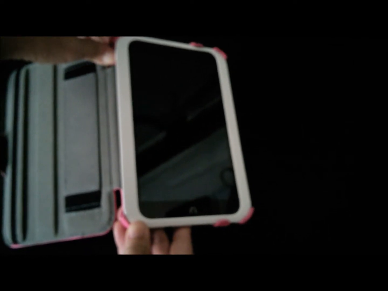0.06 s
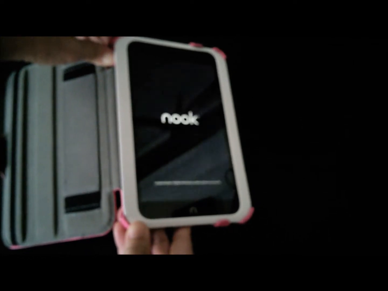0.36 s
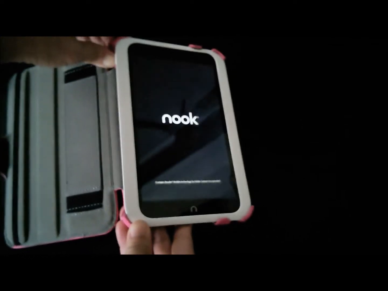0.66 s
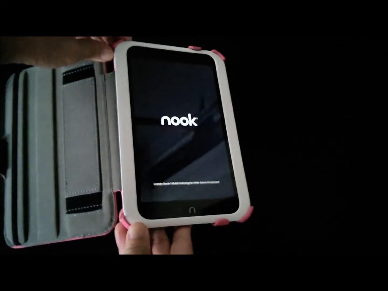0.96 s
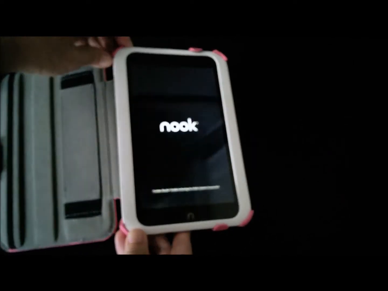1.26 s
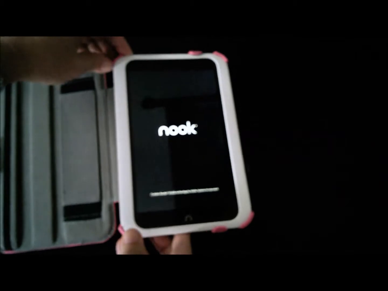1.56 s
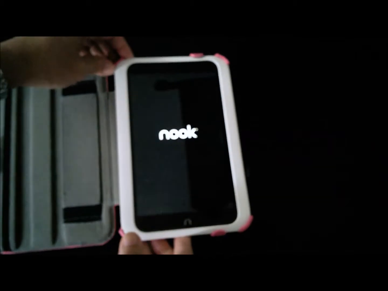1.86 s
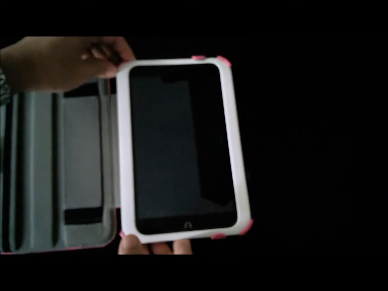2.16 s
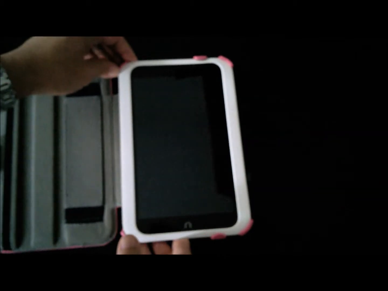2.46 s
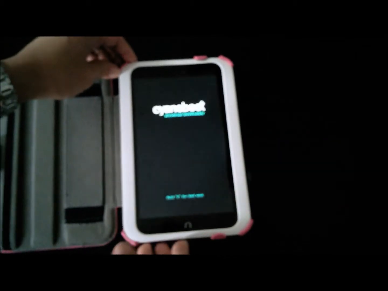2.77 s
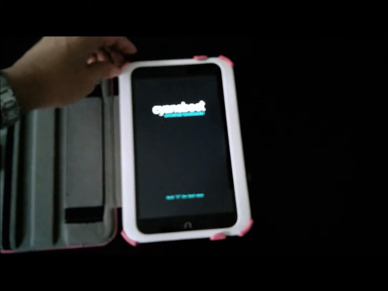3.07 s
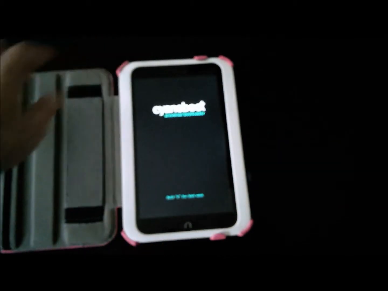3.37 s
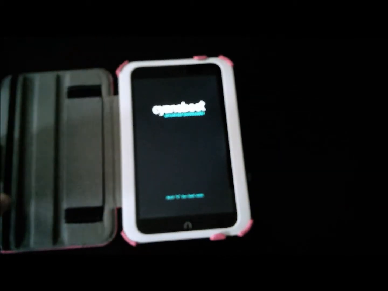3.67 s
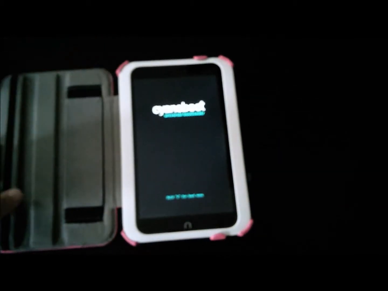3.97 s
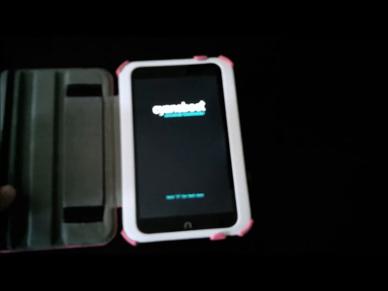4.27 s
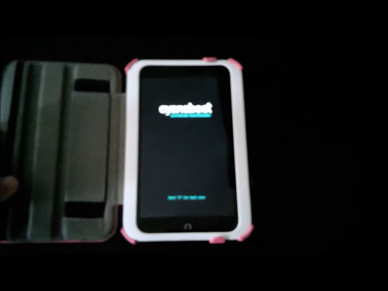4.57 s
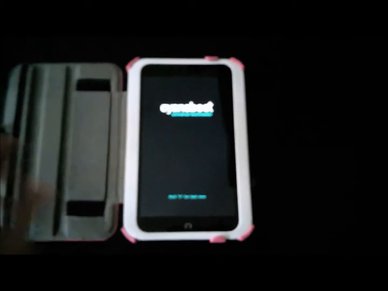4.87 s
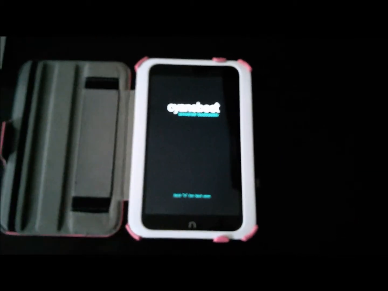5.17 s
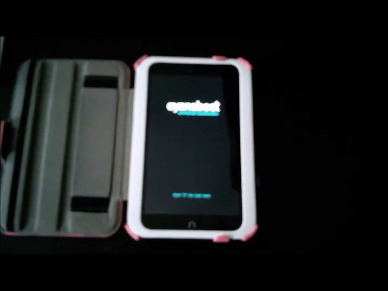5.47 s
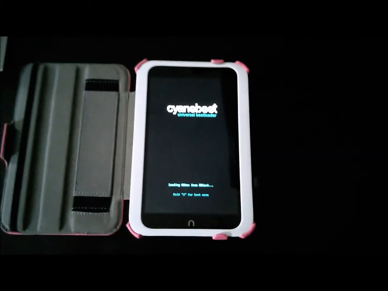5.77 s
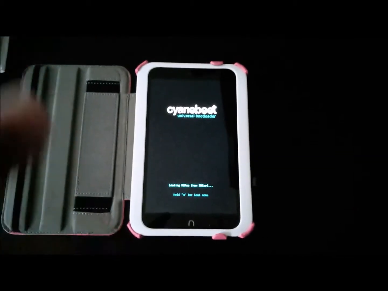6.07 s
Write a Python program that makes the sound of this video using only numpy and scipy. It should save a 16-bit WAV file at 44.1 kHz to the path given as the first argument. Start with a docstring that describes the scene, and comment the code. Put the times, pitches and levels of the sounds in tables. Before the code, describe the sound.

A plastic button clicks, a tablet case knocks onto a table, and its cover slaps down sharply in a quiet room.

```python
"""In a small quiet room, a tablet in a folio case is handled close by. Its button clicks, fingers rub and
bump the case, it is set down on a table, a hand slides over the cover, the flap slaps down and the
tablet rocks to rest. Impacts excite the damped modes of case and table; sliding friction gives grainy
noise and stick-slip squeaks. A high hiss lingers after each hit. A clock ticks faintly once a second
over a soft, steady hiss."""
import sys
import numpy as np
from scipy import signal
from scipy.fft import rfft, irfft
from scipy.io import wavfile

SR = 44100
rng = np.random.default_rng(int(sys.argv[2]) if len(sys.argv) > 2 else 0)


def master_out(mix):
    """Clip the mix to full scale and print it as 16-bit PCM to the path in sys.argv[1]."""
    frames = np.transpose(np.atleast_2d(mix))
    ceiling = np.clip(frames, -1, 1)
    pcm = np.round(ceiling * 32767).astype(np.int16)
    wavfile.write(sys.argv[1], SR, pcm)


N = 278461
TIME = np.arange(N) / SR
AGE = TIME[:SR // 4]   # seconds since a contact

# Spectra of noises and impacts. Each row: frequency in Hz, relative spectral density in dB.
HISS_SPECTRUM = [(15, -46.5), (25, -7.5), (145, -19), (256, -11.5), (503, -30.5), (754, -15), (911, 2.5),
                 (1130, -13), (1440, -6.5), (1610, -17), (1890, -5), (2050, -10), (2480, -11.5),
                 (6920, -14.5), (16000, -10.5)]
RUB_SPECTRUM = [(180, -20.5), (290, 5.5), (370, 4), (470, -11), (630, 7.5), (780, -9), (950, 1.5),
                (1250, 0), (1500, -7.5), (2100, -8.5), (3200, -25), (6000, -31.5)]   # fingers on the case
RUMBLE_SPECTRUM = [(55, -14.5), (85, -8), (130, -2), (185, -19.5), (270, -7)]   # the case under their weight
SWISH_SPECTRUM = [(600, -14.5), (950, -1), (1500, 4.5), (2000, 5.5), (2800, -0.5), (3900, -6.5),
                  (5200, -8.5), (6400, -17.5), (10500, -12.5), (16000, -22.5)]   # a hand sliding on the cover
DRAG_SPECTRUM = [(80, -20.5), (130, -9.5), (190, -31), (290, -1), (480, -7), (650, 4.5), (780, -15),
                 (950, 10), (1300, -15.5), (2000, -31.5)]   # the same hand pressing down
SNAP_SPECTRUM = [(300, 1), (1000, 0.5), (1800, 2), (2400, -7), (3000, 4), (3600, -9.5), (4500, 5),
                 (6500, -8.5), (11000, -9.5), (16000, -7)]   # plastic clicking
CLACK_SPECTRUM = [(300, -14.5), (800, 6), (1500, 3.5), (2050, -5.5), (2700, -21), (3600, -33), (5000, -33),
                  (7000, -52), (15000, -56)]   # hard parts meeting
CRACK_SPECTRUM = [(120, -18), (300, -7), (480, -5), (860, 4.5), (1250, -2), (1750, -2), (2200, -5),
                  (2800, -9), (3600, -21.5), (5000, -22.5), (7000, -44.5), (15000, -53.5)]   # the flap landing
# Electronic whine. Each row: frequency in Hz, rms level in dB.
WHINE_TONES = [(6918, -88.5), (9905, -93.5), (10890, -85.5), (11881, -80.5)]
# Short room reverberation, plus (last row) a high hiss that lingers after each hit.
# Each row: frequency in Hz, T60 in seconds, level in dB re the direct sound.
TAIL_DECAY = [(124, 0.5, -7), (300, 0.2, -5), (600, 0.092, -11.5), (1300, 0.27, -11.5), (2800, 0.25, -9.5),
              (4560, .27, -12), (7440, .4, -6.5), (13900, 0.97, 0)]
# The clock's resonances. Each row: frequency in Hz, bandwidth in Hz, relative gain in dB.
CLOCK_MODES = [(1003, 150, 0.5), (1203, 370, 0), (1637, 330, -9), (2976, 390, -4), (3416, 250, -9)]
# Successive ticks. Each entry: level in dB.
TICK_LEVELS = [-57.5, -57, -56.5, -57.5, -58, -58.5, -67.5]
# Dry skin brushing the cover. Each row: start in seconds, length in seconds, relative level in dB.
SKIN_BRUSHES = [(0.483, 0.69, -70.5), (0.7, 0.26, -70), (1.494, 0.79, -71.5), (2.214, 0.23, -70.5),
                (2.502, 0.35, -70.5), (2.85, 0.21, -67.5), (3.243, 0.21, -66.5), (3.529, 0.05, -53.5),
                (3.656, 0.037, -51), (3.74, 0.37, -69), (4.018, 0.21, -61), (4.857, 0.12, -63),
                (5.14, 0.14, -69.5), (5.537, .15, -69)]
# Shifts of grip. Each row: start in seconds, length in seconds, rub level in dB, rumble in dB re the rub.
GRIP_SHIFTS = [(.72, 0.21, -67, -1.5), (1.1, 0.27, -67, -5.5), (1.44, 0.18, -62.5, -2),
               (1.61, 0.24, -64.5, -8), (1.8, 0.23, -61.5, -7), (2.045, 0.14, -70, 1.5),
               (2.185, 0.41, -61.5, -1.5), (2.312, 0.075, -54.5, -16), (2.57, 0.6, -69.5, -20),
               (2.885, 0.118, -52, -24.5), (3.89, 0.32, -61.5, -9), (4.03, 0.3, -55.5, -9.5),
               (4.21, 0.36, -56, -13), (4.79, 0.15, -57, 4), (5.14, 0.19, -58, -9), (5.3, 0.13, -64, -6),
               (5.47, 0.25, -63.5, -8), (5.535, 0.062, -47, 4)]
# Strokes along the cover. Each row: start in seconds, length in seconds, crest as a share of the length,
# swish level in dB, drag in dB re the swish.
HAND_STROKES = [(3.532, 0.097, 0.041, -45, 1.5), (3.613, 0.052, 0.56, -41.5, -11),
                (3.656, 0.072, 0.22, -45, -13.5), (3.7, 0.18, 0.086, -64, -5.5),
                (4.568, .075, 0.9, -47.5, -8), (4.627, 0.04, 0.5, -36, -32)]
# Fingertip squeaks. Each row: start in seconds, length in seconds, pitch in Hz, levels of the
# fundamental and of the octave in dB.
FINGER_SQUEAKS = [(0.82, 0.013, 3160, -58.5, -59), (3.897, 0.015, 655, -59, -48.5),
                  (4.044, 0.041, 636, -57.5, -46), (4.087, 0.023, 622, -41, -44.5),
                  (4.351, 0.044, 720, -73, -54.5), (5.163, 0.053, 640, -49, -75),
                  (5.204, 0.015, 717, -71, -55), (5.231, 0.015, 4950, -70, -83),
                  (5.237, 0.013, 733, -57, -47), (5.322, .014, 4700, -65.5, -87),
                  (5.321, 0.046, 627, -45, -79), (5.376, 0.023, 637, -51.5, -79),
                  (5.46, 0.04, 670, -48.5, -74)]
# The tablet rocking on its cover. Each row: start in seconds, peak level in dB.
ROCK_CONTACTS = [(5.012, -55), (5.808, -54.5), (5.942, -60), (6.067, -63.5), (6.181, -54.5), (6.291, -59)]
# Modes of the plastic shell. Each row: frequency in Hz, relative level in dB, T60 in seconds.
SHELL_MODES = [(405.3, -21, 0.047), (851, -8, 0.049), (1227, -12.5, 0.034), (4660, -22, .012)]
# Plastic clicks. Each row: start in seconds, snap level in dB, relative level of the ring in dB.
BUTTON_CLICKS = [(0.097, -14, -11.5), (0.825, -40, -32), (3.812, -37.5, -35), (4.551, -32, -4),
                 (4.667, -17, -26), (4.854, -18.5, -21), (5.556, -45, -26)]
# Modes of case and table. Each row: frequency in Hz, gain in dB, T60 in seconds.
BODY_MODES = [(128, 5, 0.18), (208, -8, 0.11), (276, 1.5, 0.082), (338, -9, 0.084), (383.4, -7, .15),
              (455, -15, 0.061), (640, -6.5, 0.092), (867, 1, 0.063), (948, -1.5, 0.23), (1150, -16.5, .15),
              (1516, -12, 0.21), (1556, -2.5, 0.21), (1696, -8, .07), (1825, -12, 0.058), (2110, -15, .12),
              (2700, -9, .15)]
# Weight settling on the table. Each row: start in seconds, peak level in dB.
TABLE_THUMPS = [(1.221, -60.5), (3.906, -49), (4.494, -49), (4.669, -40.5), (5.235, -54.5), (5.563, -37.5)]
# The stiff flap landing. Each row: start in seconds, peak level in dB, pitch in Hz, hardness in dB.
FLAP_SLAPS = [(4.6654, -10.5, 1634, 3.5), (4.6681, -15, 1700, 8.5), (5.556, -34, 2150, -26),
              (5.566, -33, 1970, -13)]
# Blows on the case. Each row: start in seconds, level in dB, pitch in Hz, hardness in dB.
CASE_KNOCKS = [ (0.707, -49, 653, 1.5), (0.727, -48, 770, -5), (1.223, -51, 900, -7),
               (1.651, -59.5, 527, 9), (1.845, -40, 1110, -17), (1.850, -44.5, 590, -14),
               (2.331, -45.5, 494, 1), (2.502, -51.5, 370, -6), (2.872, -55.5, 400, 4),
               (2.903, -63, 520, 7), (3.2645, -13.5, 383, -25), (3.2772, -12.5, 748, -8),
               (3.296, -28, 544, -28), (3.3151, -16, 613, -12), (3.3585, -33, 660, -22),
               (3.367, -29.5, 575, -11), (3.453, -35.5, 563, -7), (3.462, -37, 544, -15),
               (3.892, -54, 626, 2), (4.405, -39.5, 470, -7), (4.457, -44.5, 625, -20),
               (4.536, -40.5, 550, -5), (4.8009, -20.5, 615, -30), (4.846, -30.5, 473, -22),
               (4.8542, -29.5, 650, -1.5), (4.860, -26.5, 548, -10), (5.236, -39, 387, -9),
               (5.344, -43.5, 565, -18), (5.352, -43.5, 318, -24), (5.4892, -30.5, 590, -11),
               (5.522, -27, 613, -12), (5.527, -32.5, 303, -22), (5.539, -26.5, 610, -32),
               (5.556, -24, 793, -1.5), (5.566, -27.5, 523, -13), (5.574, -30, 770, -26),
               (5.66, -40, 570, -14)]


def from_db(db):
    """Decibels to amplitude ratio."""
    return 10 ** (np.asarray(db) / 20)


def unit_rms(x):
    """Normalisation to unit power."""
    return x / np.sqrt(np.mean(x ** 2) + 1e-20)


def add(track, start_s, sound):
    """Superposition: a sound adds to the track from its start time."""
    start = int(start_s * SR)
    track[start:start + len(sound)] += sound[:N - start]


def colour(x, spectrum):
    """A minimum-phase filter of unit power gain follows a spectrum, falling 18 dB an octave outside it."""
    size = 8192
    hz, db = np.transpose(spectrum)
    octave = np.log2(np.maximum(np.arange(size // 2 + 1), 1) * SR / size)
    beyond = np.abs(octave - np.clip(octave, np.log2(hz[0]), np.log2(hz[-1])))
    gain = from_db(np.interp(octave, np.log2(hz), db) - 18 * beyond)
    cepstrum = irfft(np.log(gain))
    causal = (np.arange(size) > 0) & (np.arange(size) < size // 2)
    response = irfft(np.exp(rfft(2 * cepstrum * causal)))
    return signal.fftconvolve(x, response / np.linalg.norm(response))[:len(x)]


def resonance(x, hz, width_hz):
    """A damped two-pole resonator with unit peak gain."""
    radius = np.exp(-np.pi * width_hz / SR)
    numerator = np.array([1, 0, -1]) * (1 - radius ** 2) / 2
    denominator = [1, -2 * radius * np.cos(2 * np.pi * hz / SR), radius ** 2]
    return signal.lfilter(numerator, denominator, x + 1e-18)


def swell(peak_s):
    """Envelope of a damped contact: it builds to 1 and quickly dies away."""
    u = AGE / peak_s
    return (u * np.exp(1 - u)) ** 3


def burst(spread_s, feedback=.85):
    """All-pass scattering: short echoes in the shell spread an impulse without giving it a pitch."""
    delays_s = spread_s / np.array([[1], [2], [3], [5], [8]]) * rng.uniform(.8, 1.2, (5, 1))
    echo = np.exp(-2j * np.pi * np.round(delays_s * SR) * np.arange(len(AGE) // 2 + 1) / len(AGE))
    all_pass = (echo - feedback) / (1 - feedback * echo)
    return irfft(np.prod(all_pass, axis=0), len(AGE))


def friction(grain_db, catches_per_s):
    """Friction noise is amplitude-modulated as the surfaces catch and let go."""
    catches = np.interp(TIME * catches_per_s, np.arange(N), rng.standard_normal(N))
    return unit_rms(rng.standard_normal(N) * from_db(grain_db * catches))


def gesture(start_s, length_s, db, crest=.18):
    """Amplitude follows sliding speed: from rest to a crest, at a share of the length, and back."""
    out = np.zeros(N)
    progress = np.interp(np.arange(0, length_s, 1 / SR) / length_s, [0, crest, 1], [0, .5, 1])
    add(out, start_s, from_db(db) * np.sin(np.pi * progress))
    return out


def background(hiss_db=-67):
    """Stationary broadband hiss lies under a few thin electronic tones."""
    whine = sum(from_db(db) * np.sqrt(2) * np.sin(2 * np.pi * hz * TIME) for hz, db in WHINE_TONES)
    return from_db(hiss_db) * colour(rng.standard_normal(N), HISS_SPECTRUM) + whine


def room_and_lingering_hiss(x, first_echo_s=.0038):
    """Exponential decay by octave: short room reverberation, plus a high hiss lingering after each hit."""
    t, tail = TIME[:SR * 2 // 3], 0
    hz, t60, db = np.transpose(TAIL_DECAY)
    edges_hz = np.geomspace(62, 16000, 9)
    for low, high in zip(edges_hz, edges_hz[1:]):
        log_centre = np.log(low * high) / 2
        decay_s = np.interp(log_centre, np.log(hz), t60)
        tail_db = np.interp(log_centre, np.log(hz), db)
        fade = from_db(-60 * t / decay_s) * (t > first_echo_s)
        noise = rng.standard_normal(len(t)) * fade / np.linalg.norm(fade)
        band = signal.butter(2, [low, high], "band", fs=SR, output="sos")
        tail = tail + from_db(tail_db) * signal.sosfilt(band, noise)
    return signal.fftconvolve(x, tail)[:N]


def clock(first_s=.036, period_s=1.001, peak_s=.023):
    """Across the room each tick arrives as a decaying blur of the clock's resonances."""
    envelope, noise = np.zeros(N), rng.standard_normal(N)
    tick = AGE / peak_s * np.exp(1 - AGE / peak_s)
    for k, db in enumerate(TICK_LEVELS):
        add(envelope, first_s + k * period_s, from_db(db) * tick)
    blur = sum(from_db(db) * resonance(resonance(noise, hz, width), hz, width)
               for hz, width, db in CLOCK_MODES)
    return envelope * unit_rms(blur)


def brushing(gain_db=-2):
    """Light friction of skin on the cover gives a high, grainy hiss."""
    spectrum = [(4000, -25), (7000, -.5), (10000, 2), (15500, -6.5)]   # Hz, dB
    skin = colour(friction(grain_db=3, catches_per_s=310), spectrum)
    return skin * sum(gesture(s, length, db + gain_db) for s, length, db in SKIN_BRUSHES)


def grip(hold_rub_db=-76.5, hold_rumble_db=-90.5):
    """Finger friction rubs dully and the loaded case rumbles; the hands never keep quite still."""
    rubbing = np.max([gesture(s, length, db) for s, length, db, _ in GRIP_SHIFTS], axis=0)
    leaning = np.max([gesture(s, length, db + weight) for s, length, db, weight in GRIP_SHIFTS], axis=0)
    rub = colour(friction(grain_db=4.5, catches_per_s=54), RUB_SPECTRUM)
    rumble = colour(rng.standard_normal(N), RUMBLE_SPECTRUM)
    return (np.hypot(rubbing, from_db(hold_rub_db)) * rub
            + np.hypot(leaning, from_db(hold_rumble_db)) * rumble)


def strokes():
    """Sliding friction of a hand on the cover: speed gives a swish, pressure a lower drag."""
    speed, pressure = np.zeros(N), np.zeros(N)
    for start_s, length_s, crest, db, drag_db in HAND_STROKES:
        speed += gesture(start_s, length_s, db, crest)
        pressure += gesture(start_s, length_s, db + drag_db, crest)
    swish = colour(friction(grain_db=3, catches_per_s=650), SWISH_SPECTRUM)
    drag = colour(rng.standard_normal(N), DRAG_SPECTRUM)
    return speed * swish + pressure * drag


def squeaks(jitter=.51):
    """Stick-slip oscillation of a fingertip gives brief tones of unsteady period."""
    out = np.zeros(N)
    for start_s, length_s, hz, fundamental_db, octave_db in FINGER_SQUEAKS:
        phase = 2 * np.pi * hz * np.cumsum(1 + jitter * rng.standard_normal(len(AGE))) / SR
        tone = from_db(fundamental_db) * np.sin(phase) + from_db(octave_db) * np.sin(2 * phase)
        arch = np.sin(np.pi * np.minimum(AGE / length_s, 1))
        add(out, start_s, arch * tone)
    return out


def rocking(hz=510, peak_s=.01):
    """Each soft touch-down excites one damped note of the case."""
    out = np.zeros(N)
    for start_s, db in ROCK_CONTACTS:
        add(out, start_s, from_db(db) * swell(peak_s) * np.sin(2 * np.pi * hz * AGE))
    return out


def clicks():
    """An impulsive snap comes with a short free vibration of the plastic shell."""
    snaps, rings = np.zeros(N), np.zeros(N)
    ring = sum(from_db(db - 60 * AGE / t60) * np.sin(2 * np.pi * hz * AGE) for hz, db, t60 in SHELL_MODES)
    for start_s, db, ring_db in BUTTON_CLICKS:
        add(snaps, start_s, from_db(db) * burst(spread_s=.001))
        add(rings, start_s, from_db(db + ring_db) * ring)
    return colour(snaps, SNAP_SPECTRUM) + rings


def body(blows):
    """Modal response: each blow sets case and table ringing, with bandwidths inverse to decay time."""
    return blows + sum(from_db(db) * resonance(blows, hz, np.log(1000) / (np.pi * t60))
                       for hz, db, t60 in BODY_MODES)


def thumps(hz=122, peak_s=.006):
    """Sudden loading gives the table one slow, heavily damped swing."""
    out = np.zeros(N)
    for start_s, db in TABLE_THUMPS:
        add(out, start_s, from_db(db) * swell(peak_s) * np.cos(2 * np.pi * hz * (AGE - peak_s)))
    return out


def slaps(peak_s=.0015, crack_db=10):
    """The flap lands edge first, then flat; each impact gives a quick swing and a broadband crack."""
    swings, cracks = np.zeros(N), np.zeros(N)
    for start_s, db, hz, hard_db in FLAP_SLAPS:
        add(swings, start_s, from_db(db) * swell(peak_s) * np.cos(2 * np.pi * hz * (AGE - peak_s)))
        add(cracks, start_s + peak_s / 2, from_db(db + hard_db + crack_db) * burst(spread_s=.0012))
    return swings + colour(cracks, CRACK_SPECTRUM)


def knocks(push_db=-19, clack_db=11, rebound_db=-21, rebound_gap_s=.011, rebound_octaves=.3):
    """Damped impact: the padded case swings a few cycles and pushes on the table; hard parts clack."""
    full_blow_db, rise_cycles, cycles_per_db = -13.5, 1.15, .028   # lighter blows build more slowly
    swings, clacks = np.zeros(N), np.zeros(N)
    for start_s, db, hz, hard_db in CASE_KNOCKS:
        peak_s = (rise_cycles + cycles_per_db * (full_blow_db - db)) / hz
        swing = np.cos(2 * np.pi * hz * (AGE - peak_s)) + from_db(push_db)
        add(swings, start_s, from_db(db) * swell(peak_s) * swing)
        add(clacks, start_s + peak_s / 2, from_db(db + hard_db + clack_db) * burst(spread_s=.0014))
        # loose parts touch again three times, each at its own pitch
        for k, (late, detune) in enumerate(rng.uniform(-.8, 1, size=(3, 2)), start=1):
            touch = swell(peak_s) * np.sin(2 * np.pi * hz * 2 ** (rebound_octaves * detune) * AGE)
            add(swings, start_s + rebound_gap_s * (k + late / 2), from_db(db + rebound_db) / k * touch)
    return swings + colour(clacks, CLACK_SPECTRUM)


def scene(low_cut_hz=80):
    """The direct sound and its decaying tail add at one microphone; small sources radiate no deep bass."""
    impacts = body(knocks() + thumps() + slaps()) + clicks() + rocking()
    sliding = squeaks() + grip() + brushing() + strokes()
    low_cut = signal.butter(4, low_cut_hz, "high", fs=SR, output="sos")
    direct = signal.sosfilt(low_cut, impacts + sliding + clock())
    return (direct + room_and_lingering_hiss(direct) + background())[None]


def record(dry, cutoff_hz=15900):
    """A steep low-pass filter limits the bandwidth."""
    return signal.sosfilt(signal.ellip(12, .1, 80, cutoff_hz, fs=SR, output="sos"), dry)


dry = scene()
out = record(dry)
master_out(out)
```